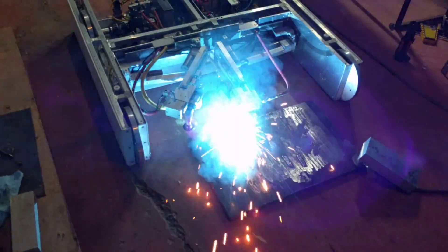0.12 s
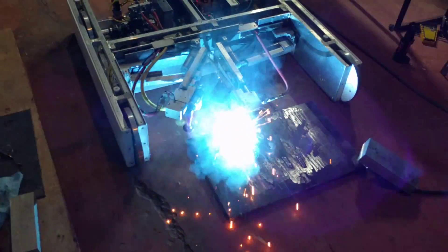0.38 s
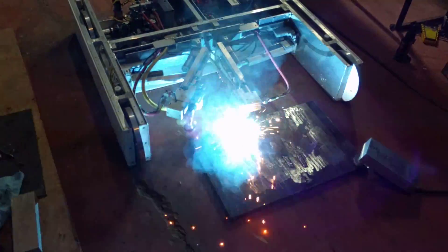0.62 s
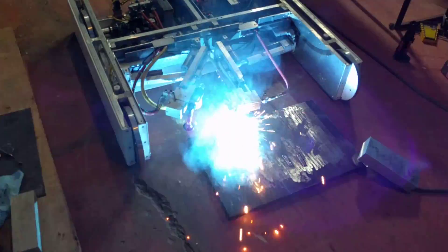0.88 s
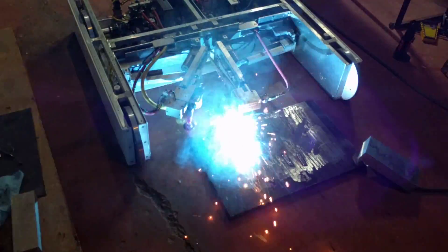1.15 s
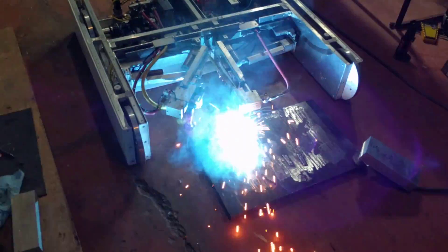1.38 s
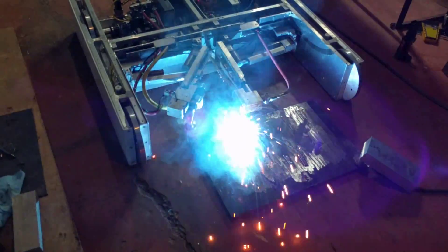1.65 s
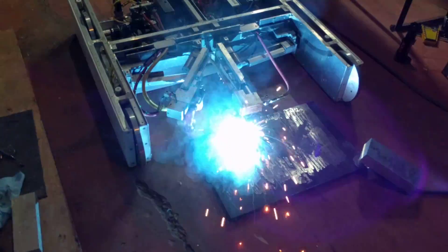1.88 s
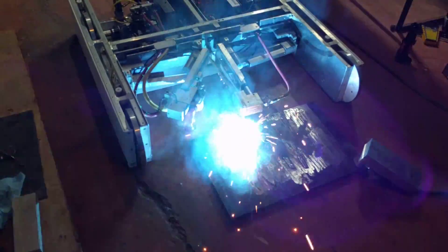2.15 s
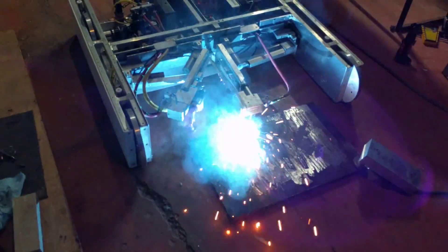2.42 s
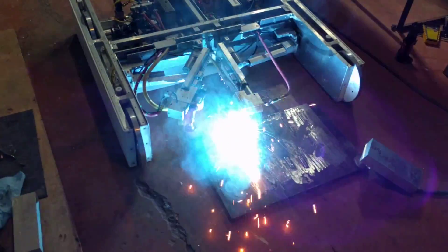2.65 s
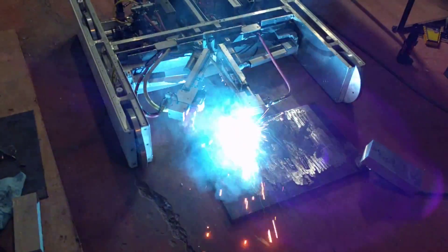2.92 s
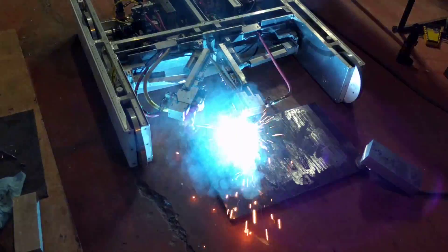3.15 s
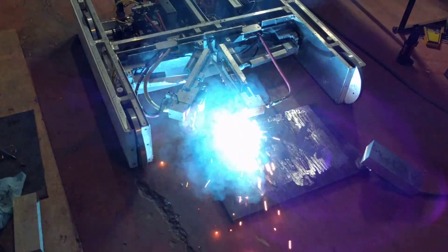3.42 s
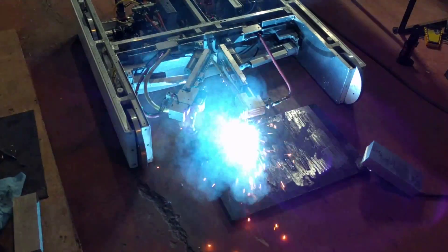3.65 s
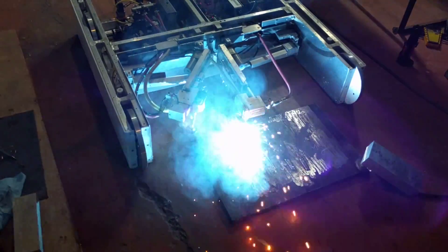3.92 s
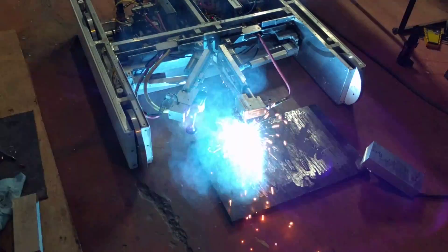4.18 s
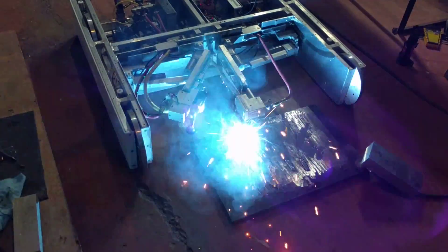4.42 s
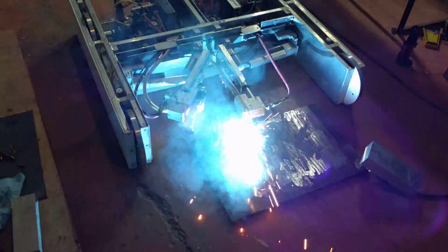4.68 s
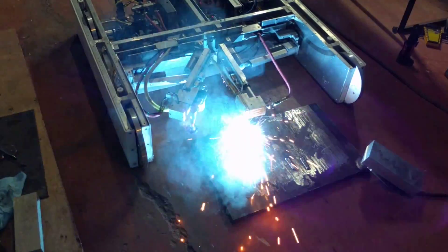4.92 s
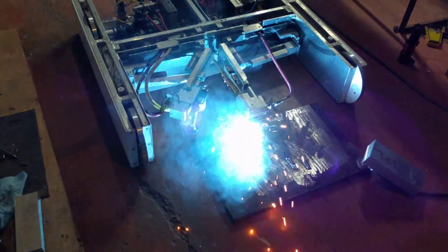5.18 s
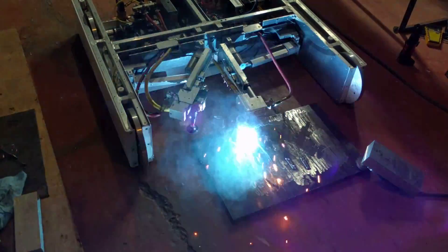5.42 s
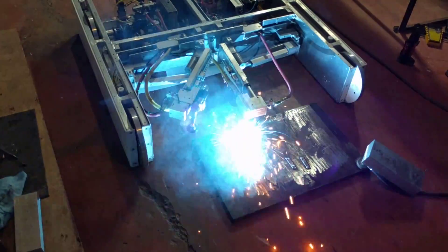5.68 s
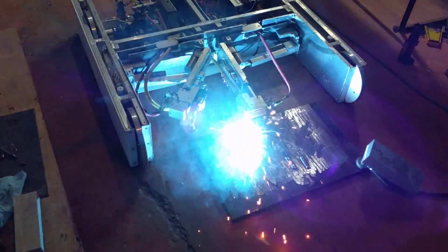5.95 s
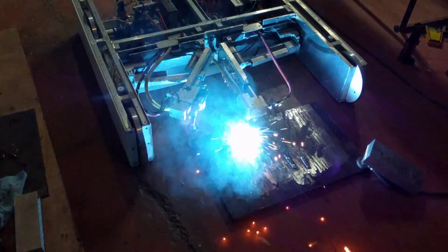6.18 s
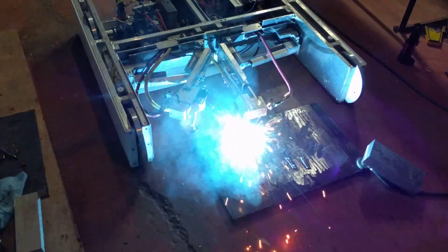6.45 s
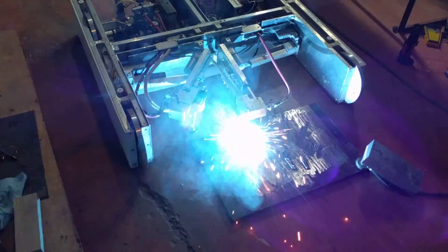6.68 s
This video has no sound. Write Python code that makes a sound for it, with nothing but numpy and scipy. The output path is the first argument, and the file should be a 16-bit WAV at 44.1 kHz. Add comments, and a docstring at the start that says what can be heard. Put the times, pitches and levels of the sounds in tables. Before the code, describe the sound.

A robotic welding arc is already burning on a steel plate and continues to the end. Dozens of sharp cracks a second run into a ragged buzzing crackle, with bright sizzle and irregular thumping pops. Pops are thickest in the first four seconds, then sparser. Short echoes return from metal and walls; gas hisses and machines rumble faintly behind. Close, loud mono microphone with thin bass and slightly rounded peaks.

```python
"""A wire-fed welding arc burns on a steel plate inside a robot frame in a workshop.
The wire shorts and restrikes some eighty times a second, each strike a sharp crack; the hardest also thump.
Between cracks the arc sizzles with clouds of tiny clicks, and while the wire sticks a low noise swells.
Every crack comes back from plate, frame and walls as short echoes and a fading noise tail.
Behind it the shielding gas hisses and machines rumble: both are noise shaped in pitch, with two hum tones."""
import sys
import numpy as np
from scipy import signal
from scipy.fft import rfft, irfft, next_fast_len
from scipy.io import wavfile
from scipy.ndimage import uniform_filter1d

SR = 44100
rng = np.random.default_rng(int(sys.argv[2]) if len(sys.argv) > 2 else 0)


def level_to_linear(level):
    """Convert decibel levels to linear amplitude factors, elementwise."""
    exponent = np.asarray(level, float) / 20
    return 10 ** exponent


def wrap_up_sound(samples):
    """Save the sound to the file named by the first command line argument, as 16-bit audio."""
    columns = np.atleast_2d(samples).T
    # keep every value between -1 and 1, then stretch to whole-number steps
    tamed = np.clip(columns, -1, 1)
    steps = np.round(tamed * 32767).astype(np.int16)
    wavfile.write(sys.argv[1], SR, steps)


N = 300744  # length in samples

# The burning arc over time. Each row: time in seconds, sizzle level in dB before mixing,
# treble against the rest in dB, crack level in dB before its gain, puff size of a plain restrike.
ARC_COURSE = [(0, -18.5, 4, -6.5, 0.053), (.5, -23.5, 5.5, -5.5, .07), (1.2, -22, 3.5, -4, .07),
              (1.8, -22.5, 4, -6.5, 0.071), (2.05, -21.5, 3.5, -5.5, .02), (2.4, -23.5, 4, -4.5, 0.04),
              (2.9, -23.5, 8, -5, 0.087), (3.3, -23, 2, -3, 0.1), (3.75, -22.5, 4, -5.5, 0.1),
              (3.95, -27, 3, -2, 0.038), (4.3, -25.5, -0.5, -5, 0.052), (4.7, -23, 11, -5.5, 0.088),
              (5.15, -27, 3, -3.5, 0.027), (5.4, -21, 5, -5, .05), (5.7, -23, 6, -4, 0.028),
              (6.2, -22, 3.5, -4, 0.036), (6.35, -20.5, 4.5, -3, 0.054), (6.82, -25, 5, -3.5, 0.071)]
# Hard restrikes that pop. Each row: time in seconds, height of the gas puff,
# height of the longer heave (both relative; negative = suction).
POPS = [(0.1055, .19, 0), (0.1433, 0.26, -1.1), (.1636, 0.28, -0.68), (0.175, 0.081, -0.13),
        (.2304, 0.23, -0.65), (.2374, 0.24, -0.033), (0.3308, 0.12, 0), (.35, 0.37, -0.1),
        (0.3853, 0.24, -.22), (0.4494, 0.16, -0.081), (0.4642, 0.24, 0.036), (.5792, 0.17, -0.069),
        (0.5873, .32, -0.62), (0.5999, 0.21, -0.1), (0.6313, 0.21, -.69), (0.6399, .23, -0.07),
        (0.6614, .27, -0.052), (0.6866, 0.31, 0), (.8007, 0.26, -.24), (0.8175, 0.29, -0.022),
        (0.8913, 0.14, 0.037), (0.9195, 0.14, -0.082), (0.9334, .24, -0.3), (1.0348, 0.26, -0.062),
        (1.0597, .2, -0.07), (1.0819, 0.33, -.07), (1.0982, 0.23, 0), (1.1315, 0.32, -0.59),
        (1.1777, 0.38, -0.34), (1.216, .15, 0.063), (1.341, 0.33, -0.25), (1.3871, 0.2, 0),
        (1.4266, 0.37, -.57), (1.4399, 0.23, 0), (1.4549, .2, -0.077), (1.5229, 0.28, -.25),
        (1.5366, 0.22, 0), (1.5681, 0.24, -0.062), (1.6393, 0.33, -.43), (1.6526, 0.16, -0.035),
        (1.8633, 0.27, 0), (1.879, 0.39, 0.6), (1.8871, 0.21, -1.37), (1.9049, 0.34, -0.46),
        (1.9198, 0.24, -.37), (1.9376, 0.27, -0.5), (2.119, .16, -0.036), (2.1746, .1, -1.15),
        (2.1955, 0.29, -0.71), (2.2045, 0.17, -0.18), (2.2191, .13, -.38), (2.2656, 0.19, 0),
        (2.2897, 0.24, 0), (2.3203, 0.23, -0.19), (2.393, 0.16, -.25), (2.4996, 0.21, -0.073),
        (2.5571, 0.29, -0.033), (2.6089, 0.34, -0.21), (2.6536, 0.27, -.63), (2.716, 0.35, -0.49),
        (2.7713, 0.45, -0.4), (2.8004, 0.29, -.37), (2.8992, 0.19, -0.048), (2.923, 0.16, 0),
        (2.9403, 0.3, -.47), (3.0683, 0.25, -0.12), (3.1072, 0.098, 1), (3.1204, -.25, 0.13),
        (3.1505, 0.28, -0.35), (3.1694, 0.27, -.27), (3.2099, .2, -0.043), (3.2309, 0.18, 0),
        (3.2522, .17, 0), (3.3184, .39, -.48), (3.3492, .37, -0.61), (3.3624, 0.14, -0.074),
        (3.4325, 0.37, -0.39), (3.4795, 0.28, 0), (3.5025, 0.36, -0.13), (3.518, 0.41, -0.6),
        (3.5826, .26, -0.18), (3.6022, 0.32, 0), (3.6215, 0.22, 0), (3.6684, 0.17, -1.43),
        (3.6818, 0.365, -0.063), (3.6994, 0.22, -0.043), (3.7653, 0.39, -0.52), (3.8421, .15, -0.37),
        (3.8676, .2, 0), (4.218, 0.22, 0), (4.334, 0.23, -0.082), (4.3739, 0.13, -0.36),
        (4.5248, .3, -0.072), (4.6164, 0.14, -.44), (4.6873, 0.28, -.71), (4.7011, 0.24, -0.049),
        (4.716, .24, -0.036), (4.7424, 0.23, -.36), (4.9345, 0.24, -.23), (5.076, .17, -0.8),
        (5.253, .29, 0), (5.55, 0.3, 0), (5.5634, -0.094, -0.11), (5.5664, 0.042, -1.76),
        (5.5778, 0.4, -.21), (5.6199, .05, -1.15), (5.6313, 0.26, -.11), (6.0617, 0.17, 0),
        (6.16, 0.2, -0.41), (6.2246, 0.2, 0), (6.2968, -0.028, 0), (6.6735, .2, -0.37),
        (6.714, 0.14, -0.084), (6.7979, 0.11, -0.42)]
# Restrikes that crack sharply without a pop. Each entry: time in seconds.
SHARP_STRIKES = [.0824, .1203, .7833, .8726, 1.3111, 1.6765, 1.808, 2.0238, 2.4542, 2.7501, 2.8079, 2.8575,
                 2.9567, 3.0159, 3.4025, 3.449, 3.8197, 3.9173, 3.972, 4.028, 4.0452, 4.0677, 4.0901,
                 4.1729, 4.2652, 4.3031, 4.3932, 4.4341, 4.4882, 4.5418, 4.6508, 4.8194, 4.9099, 4.9748,
                 5.0523, 5.1128, 5.1716, 5.209, 5.2321, 5.2899, 5.3245, 5.3715, 5.4001, 5.416, 5.6511,
                 5.7152, 5.7605, 5.8376, 5.904, 5.939, 5.9666, 6.0413, 6.0838, 6.1287, 6.237, 6.3257,
                 6.3851, 6.4029, 6.4388, 6.5167, 6.5752, 6.6184, 6.649, 6.7371, 6.7642]
# The wire sticks and no plain strike comes. Each row: start in seconds, length in seconds.
STALLS = [(2.121, .053), (5.418, .118), (6.239, .058)]
# The arc flares up. Each row: peak time in seconds, rise over the sizzle in dB,
# rise time in seconds, fall time in seconds.
FLARES = [(0.361, 1, 0.037, 0.076), (2.177, 8.5, .008, 0.096), (2.94, 7.5, 0.018, 0.036),
          (3.12, 8.5, 0.061, 0.047), (3.84, 10.5, .04, 0.043), (4.37, 6.5, 0.058, 0.064),
          (4.52, 3.5, 0.039, 0.03), (4.94, 8, 0.049, 0.063), (5.05, 10, 0.0157, 0.069),
          (5.56, 10, 0.13, 0.065), (5.625, 6, 0.056, 0.041), (6.298, 4.5, .006, 0.024),
          (6.8, 9, .02, 0.093)]
# Colour of the sizzle. Each row: frequency in Hz, relative level in dB per Hz.
SIZZLE_COLOUR = [(350, -7.5), (600, -5.5), (1200, -3), (1800, -4.5), (2600, -7.5), (3700, -1.5),
                 (5100, -4.5), (7300, -2), (9000, -2.5), (13000, -3.5), (14600, -1), (15600, 3)]
# Strongest reflections from plate, frame and floor. Each row: delay in ms, share of the direct crack.
ECHOES = [(0.227, -0.15), (0.34, -0.24), (0.385, -0.18), (0.499, 0.66), (0.567, 0.19), (0.658, -0.15),
          (0.68, 0.21), (0.748, -0.4), (0.794, -0.21), (0.816, 0.17), (0.952, -0.31), (1.066, 0.26),
          (1.111, 0.16), (1.791, -0.17), (3.152, -0.13), (4.331, 0.14), (4.422, 0.21), (4.603, 0.18),
          (5.692, 0.18), (6.122, 0.15), (6.213, 0.16), (6.259, 0.23), (11.61, 0.25), (19.32, 0.23),
          (19.342, 0.18), (22.63, 0.16), (22.698, -0.16)]
# Colour of the shielding gas hiss. Each row: frequency in Hz, relative level in dB per Hz.
GAS_COLOUR = [(700, -23), (1200, -3.5), (2200, -22), (3600, -9), (5700, -9.5), (7850, -0.5), (10000, -14),
              (15600, -9.5)]
# Colour of the workshop rumble. Each row: frequency in Hz, relative level in dB per Hz.
RUMBLE_COLOUR = [(21, -51), (35, -1.5), (80, 7.5), (172, 2.5), (483, 10), (677, -22), (1090, -1),
                 (1220, -12), (1750, -27), (2000, -13), (2600, -99), (4400, -120)]
# Hum of motors and transformer. Each row: frequency in Hz, middle level in dB at the microphone.
HUM = [(120, -61), (245, -54.5)]
# Bass cut of the microphone, one stage a row. Each row: frequency in Hz, sharpness Q.
LOW_CUT = [(53, 1.79), (51, .56)]

# Waits between plain restrikes: every other wait is short with the chance SHORT_SHARE
SHORT_WAIT_MS, LONG_WAIT_MS, SHORT_SHARE = 8.3, 15.5, 0.8
SHORT_JITTER_MS, LONG_JITTER_MS = 0.8, 2.5
LEAST_WAIT_MS = 6  # free time kept before the next listed strike or stall
CRACK_SPREAD_DB = 2.24  # chance in the crack level
SHARP_DB = 1.5  # sharp strikes over the usual crack
QUICK_SHARE = 1.21  # quick part of a heave, against the slow part
STALL_DIP_DB, STALL_DULL_DB = 1.5, 9  # sizzle and treble lost while the wire sticks
RIPPLE_HZ = 360  # ripple of the rectified supply
NOZZLE_HZ, NOZZLE_T60_S = 1805, 0.035
SHOP_T60_S, SHOP_TREBLE_T60_S = 0.4, 0.24  # time to fade by 60 dB
SHOP_DB = 3  # energy of the tail against the direct sound
RUSH_DB, RUSH_RISE_DB_PER_S = -47, 110
GAS_DB, RUMBLE_DB = -31, -46.5  # levels at the microphone
TOP_HZ = 15740


def rms_one(x):
    """Scale to an average strength (rms) of 1."""
    return x / np.sqrt(np.mean(x ** 2) + 1e-20)


def impulses(s, heights):
    """One click, a single sample wide, at each time."""
    out = np.zeros(N)
    places = np.round(np.asarray(s) * SR).astype(int)
    np.add.at(out, np.clip(places, 0, N - 1), heights)
    return out


def coloured(x, spectrum):
    """Filter x with a curve of (Hz, dB per Hz), then scale to rms 1."""
    size = next_fast_len(N)
    hz, db = np.transpose(spectrum)
    bins_hz = np.arange(size // 2 + 1) * SR / size
    gain = level_to_linear(np.interp(np.log(bins_hz + 1), np.log(hz), db))
    return rms_one(irfft(rfft(x, size) * gain, size)[:N])


def drift(rate_hz):
    """Random wandering with rms 1: noise smoothed twice, so only changes slower than the rate stay."""
    r = np.exp(-2 * np.pi * rate_hz / SR)
    noise = rng.standard_normal(N + SR)
    # the first second lets the filter settle
    return rms_one(signal.lfilter([1], [1, -2 * r, r * r], noise)[SR:])


def fading(x, ms):
    """Turn each click into an exponential decay that starts at the click's height."""
    return signal.lfilter([1], [1, -np.exp(-1000 / (ms * SR))], x)


def low_pass(x, order, hz):
    """Keep what lies below a frequency."""
    return signal.sosfilt(signal.butter(order, hz, fs=SR, output="sos"), x)


def band_pass(x, low_hz, high_hz):
    """Keep a band of frequencies, with gentle edges."""
    return signal.sosfilt(signal.butter(1, [low_hz, high_hz], "band", fs=SR, output="sos"), x)


def high_pass(x, hz, q):
    """Second-order filter that keeps what lies above a frequency; q sets how sharp its corner is."""
    w = 2 * np.pi * hz / SR
    c, width = np.cos(w), np.sin(w) / (2 * q)
    top = [(1 + c) / 2, -1 - c, (1 + c) / 2]
    return signal.lfilter(top, [1 + width, -2 * c, 1 - width], x + 1e-18)


def arc_at(s):
    """Sizzle level, treble tilt, crack level and puff size of the arc at these times."""
    times, *columns = np.transpose(ARC_COURSE)
    return [np.interp(s, times, column) for column in columns]


def strikes():
    """All restrikes (s, crack dB, puff): plain ones follow each listed strike or stall until the next."""
    pops, pop_puff, _ = np.transpose(POPS)
    stuck, length = np.transpose(STALLS)
    starts = np.sort([0, *pops, *SHARP_STRIKES, *(stuck + length)])
    ends = np.sort([*pops, *SHARP_STRIKES, *stuck, N / SR])
    ends = ends[np.searchsorted(ends, starts, "right")]
    shape = (len(starts), 32)  # up to 32 plain strikes in each gap
    jitter, size, spread = rng.standard_normal((3, *shape))
    short = (rng.random(shape) < SHORT_SHARE) & (np.arange(32) % 2 == 1)
    short_wait = SHORT_WAIT_MS + SHORT_JITTER_MS * jitter
    long_wait = LONG_WAIT_MS + LONG_JITTER_MS * jitter
    wait_ms = np.where(short, short_wait, long_wait)
    s = starts[:, None] + np.cumsum(wait_ms, axis=1) / 1000
    keep = s < ends[:, None] - LEAST_WAIT_MS / 1000
    plain = s[keep]

    plain_db = CRACK_SPREAD_DB * spread[keep]
    pop_db = CRACK_SPREAD_DB * rng.standard_normal(len(pops))
    sharp_db = np.full(len(SHARP_STRIKES), SHARP_DB)
    plain_puff = arc_at(plain)[3] * np.abs(size[keep])
    sharp_puff = arc_at(SHARP_STRIKES)[3]

    s = np.concatenate([plain, pops, SHARP_STRIKES])
    crack_db = arc_at(s)[2] + np.concatenate([plain_db, pop_db, sharp_db])
    return s, crack_db, np.concatenate([plain_puff, pop_puff, sharp_puff])


def cracks(struck, cut_hz, gain_db, short_db, short_ms):
    """A strike is a steep push; just before it the molten wire touches down and the arc dies with a weaker pull."""
    s, db, _ = struck
    time_chance, level_chance = rng.standard_normal((2, len(s)))
    short_s = s - (short_ms + 0.3 * time_chance) / 1000
    pulls = impulses(short_s, level_to_linear(db + short_db + 1.5 * level_chance))
    pushes = impulses(s, level_to_linear(db))
    return level_to_linear(gain_db) * high_pass(pushes - pulls, cut_hz, 0.39)


def thumps(struck, snap_db):
    """Heated gas: a soft puff with a brighter snap under every strike, a longer heave under hard ones."""
    s, _, height = struck
    clicks = impulses(s, height)
    b, a = signal.butter(1, [200, 800], "band", fs=SR)
    puffs = signal.lfilter(b, a, clicks) / (2 * b[0])  # each puff starts at half its height
    snaps = band_pass(clicks, 900, 3000)
    pop_s, _, heave = np.transpose(POPS)
    heave_clicks = impulses(pop_s, heave)
    # taking away a quick decay makes the heave open with a brief swing the other way
    heaves = fading(heave_clicks, 2.8) - QUICK_SHARE * fading(heave_clicks, 0.56)
    return puffs + level_to_linear(snap_db) * snaps + heaves


def burning():
    """Level and treble tilt of the sizzle in dB: slow course, flares on top, duller while the wire sticks."""
    t = np.arange(N) / SR
    level_db, tilt_db = arc_at(t)[:2]
    for s, db, rise, fall in FLARES:
        level_db = level_db + np.interp(t, [s - rise, s, s + fall], [0, db, 0])
    stuck = np.zeros(N)
    for s, length in STALLS:
        stuck += np.interp(t, [s, s + 0.012, s + length - 0.005, s + length], [0, 1, 1, 0])
    return level_db - STALL_DIP_DB * stuck, tilt_db - STALL_DULL_DB * stuck


def sizzle(struck, per_s, spread_db, ripple, flicker_db, flare_db, flare_ms):
    """Tiny discharges in the arc, flaring after each strike and pulsing with the ripple of the rectified supply."""
    level_db, tilt_db = burning()
    t = np.arange(N) / SR
    sizes = level_to_linear(spread_db * np.minimum(rng.exponential(1, N), 5)) * rng.choice([-1, 1], N)
    happens = rng.random(N) < per_s / SR
    grains = coloured(sizes * happens, SIZZLE_COLOUR)
    # the tilt lifts the treble by half and lowers the rest by half
    low = low_pass(grains, 1, 6000)
    tilt = level_to_linear(tilt_db / 2)
    grains = low / tilt + (grains - low) * tilt
    pulsing = 1 + ripple * np.sin(2 * np.pi * RIPPLE_HZ * t)
    afterglow = fading(impulses(struck[0], 0.81), flare_ms)
    flare = np.sqrt(1 + level_to_linear(2 * flare_db) * afterglow)
    return grains * flare * pulsing * level_to_linear(level_db + flicker_db * drift(79))


def rush():
    """Gas round the stuck wire rushes ever louder, as low noise, until the arc is back."""
    t = np.arange(N) / SR
    swell = np.zeros(N)
    for s, length in STALLS:
        during = (t > s) & (t < s + length)
        swell += during * level_to_linear(RUSH_DB + RUSH_RISE_DB_PER_S * np.clip(t - s, 0, length))
    noise = band_pass(rng.standard_normal(N), 350, 1600)
    return uniform_filter1d(swell, size=400) * rms_one(noise)


def reflected(x, wall_cut_hz, dull_hz, ring_db):
    """Direct sound, near reflections, the ring of the gas nozzle and the diffuse tail of the shop."""
    ms, share = np.transpose(ECHOES)
    t = np.arange(SR // 2) / SR
    near = impulses([0, *ms / 1000], [1, *share])[:len(t)]
    ring = level_to_linear(ring_db - 60 * t / NOZZLE_T60_S) * np.sin(2 * np.pi * NOZZLE_HZ * t)
    noise = high_pass(rng.standard_normal(len(t)), wall_cut_hz, 0.46)
    dull = low_pass(noise, 2, dull_hz)
    # air eats the treble first
    tail = dull * level_to_linear(-60 * t / SHOP_T60_S) + (noise - dull) * level_to_linear(-60 * t / SHOP_TREBLE_T60_S)
    tail = tail * np.minimum(t / 0.0034, 1)  # builds up over 3.4 ms
    tail = level_to_linear(SHOP_DB) * tail / np.sqrt(np.sum(tail ** 2))
    return signal.fftconvolve(x, near + ring + tail)[:N]


def gas_hiss():
    """Shielding gas streams out as steady coloured noise."""
    return level_to_linear(GAS_DB) * coloured(rng.standard_normal(N), GAS_COLOUR)


def workshop():
    """Steady rumble of fans and power supply with two hum tones that waver in level."""
    t = np.arange(N) / SR
    sound = level_to_linear(RUMBLE_DB) * coloured(rng.standard_normal(N), RUMBLE_COLOUR)
    for hz, db in HUM:
        sound += level_to_linear(db + 3 * drift(3)) * np.sqrt(2) * np.sin(2 * np.pi * hz * t)
    return sound


def scene():
    """The arc in its surroundings over gas hiss and shop noise."""
    struck = strikes()
    crack = cracks(struck, cut_hz=716, gain_db=6, short_db=-9.5, short_ms=2.4)
    fizz = sizzle(struck, per_s=9000, spread_db=3.5, ripple=0.18,
                  flicker_db=3.0, flare_db=4.0, flare_ms=0.91)
    # droplets all over the plate: no shared echoes
    spatter = sizzle(struck, per_s=15000, spread_db=1.5, ripple=0.14,
                     flicker_db=3.0, flare_db=9.5, flare_ms=3.85)
    arc = reflected(crack + level_to_linear(-11) * fizz, wall_cut_hz=2200, dull_hz=7830, ring_db=-28.5)
    arc = arc + level_to_linear(-4.5) * spatter
    mix = arc + thumps(struck, snap_db=12.5) + rush() + gas_hiss() + workshop()
    return mix[None]


def roll_off(x):
    """The treble ends steeply here."""
    return signal.sosfilt(signal.butter(12, 16750, fs=SR, output="sos"), x)


def record(dry):
    """The microphone cuts the bass steeply and rounds the peaks; nothing passes above the top edge."""
    for hz, q in LOW_CUT:
        dry = high_pass(dry, hz, q)
    rounded = 1.456 * np.tanh(dry / 1.368)
    size = next_fast_len(N)
    passed = np.arange(size // 2 + 1) * SR / size < TOP_HZ
    mix = irfft(rfft(rounded, size) * passed, size)[:, :N]
    return roll_off(mix)


dry = scene()
out = record(dry)
wrap_up_sound(out)
```